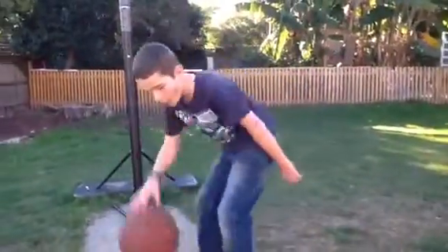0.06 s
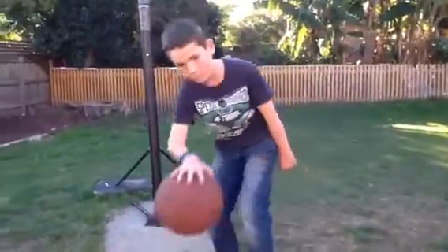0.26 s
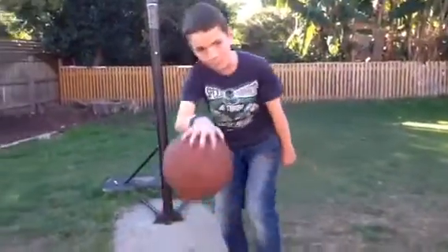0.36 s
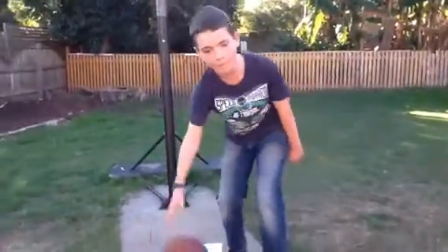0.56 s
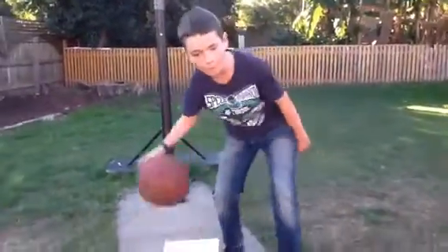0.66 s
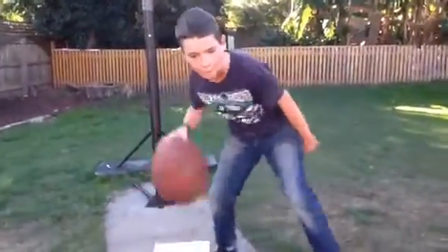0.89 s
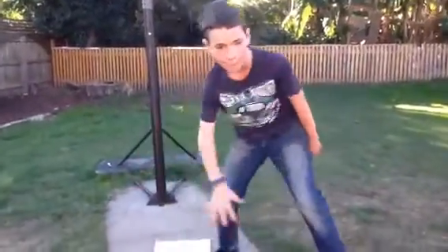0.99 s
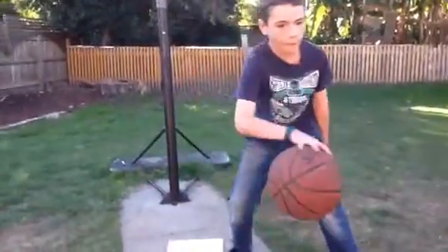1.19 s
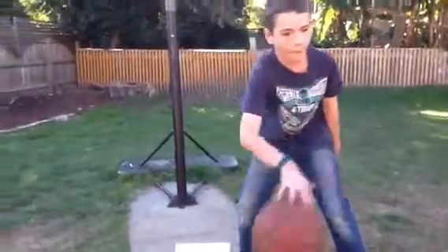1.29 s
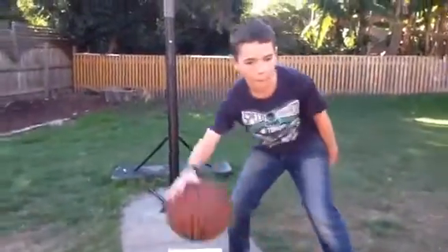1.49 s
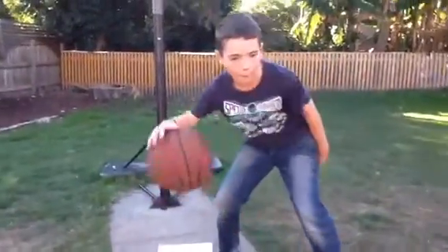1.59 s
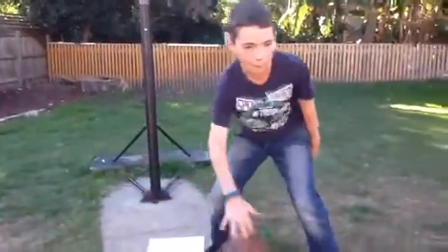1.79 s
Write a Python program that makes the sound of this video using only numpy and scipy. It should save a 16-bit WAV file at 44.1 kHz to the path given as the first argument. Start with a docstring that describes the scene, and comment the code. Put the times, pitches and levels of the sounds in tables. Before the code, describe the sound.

A basketball is dribbled on concrete close by, bouncing at about 0.2, 0.6, 1.1 and 1.5 seconds, the last a little softer. Each bounce is a sharp slap with a low thump, a short hollow ring and a light garden echo. A soft palm pat comes just before the first bounce; faint finger taps and brushes follow between and after the bounces, over a quiet outdoor hush.

```python
"""Basketball dribbled in a garden

A ball bounces four times on a concrete pad, close to a small microphone. Each bounce is a sharp slap,
a low thump of the flexing shell and a short ring of the shell and the air inside; fence and garden echo.
Between bounces the hand pats and brushes the ball, over a faint outdoor hush."""
import sys
import numpy as np
from scipy import signal
from scipy.fft import rfft, irfft, next_fast_len
from scipy.io import wavfile

SR = 44100
rng = np.random.default_rng(int(sys.argv[2]) if len(sys.argv) > 2 else 0)


def transcribe(signal):
    """Save signal, clipped to [-1, 1], as a 16-bit WAV file at the path in sys.argv[1]."""
    frames = np.atleast_2d(signal).T
    limited = np.clip(frames, -1, 1)
    pcm = np.round(limited * 32767).astype(np.int16)
    wavfile.write(sys.argv[1], SR, pcm)


N = 81585


def amp(db):
    """Decibels to gain."""
    return 10 ** (np.asarray(db) / 20)


def along(points, hz):
    """Interpolate (freq_hz, value) points on a log axis."""
    freqs, values = np.transpose(points)
    return np.interp(np.log(hz + 1), np.log(freqs + 1), values)


def since(start_s):
    """Seconds since start_s, zero before."""
    return np.maximum(np.arange(N) / SR - start_s, 0)


def fade(t, t60_s):
    """Sudden start, exponential decay."""
    return (t > 0) * np.exp(-np.log(1000) * t / t60_s)


def mode(t, hz, t60_s):
    """Decaying sine."""
    return fade(t, t60_s) * np.sin(2 * np.pi * hz * t)


def noise(spectrum):
    """Coloured noise, rms 1."""
    size = next_fast_len(N)
    gain = amp(along(spectrum, np.fft.rfftfreq(size, 1 / SR)))
    x = irfft(rfft(rng.standard_normal(size)) * gain, size)[:N]
    return x / np.sqrt(np.mean(x ** 2) + 1e-20)


def pulse(spectrum, size=2048):
    """Minimum-phase click, peak 1."""
    gain = amp(along(spectrum, np.fft.rfftfreq(size, 1 / SR)))
    cepstrum = irfft(np.log(gain))
    cepstrum[1:size // 2] *= 2
    cepstrum[size // 2 + 1:] = 0
    click = irfft(np.exp(rfft(cepstrum)))
    return np.pad(click / np.abs(click).max(), (0, N - size))


def delayed(x, delay_s):
    """Whole-sample delay."""
    return np.pad(x, (round(delay_s * SR), 0))[:N]


def butter(x, hz, kind, order):
    """Causal low-pass or high-pass."""
    return signal.sosfilt(signal.butter(order, hz, kind, fs=SR, output="sos"), x)


# freq_hz, density_db
HUSH_SPECTRUM = [(24, -57), (40, -35), (98, 2), (235, -2), (484, 0), (740, -6.5), (1080, -3.5), (1160, -7),
                 (1410, -7.5), (2330, -15), (2920, -14.5), (15500, -23)]


def outdoor_hush(level_db=-59.5):
    """Faint, steady background noise."""
    return amp(level_db) * noise(HUSH_SPECTRUM)


# freq_hz, density_db
GARDEN_SPECTRUM = [(70, -15), (150, 6), (280, 10), (400, -1.5), (520, 2.5), (750, -8.5), (1300, -13),
                   (2900, -22.5), (5000, -31), (14000, -51)]
# freq_hz, t60_s
GARDEN_DECAY = [(150, 0.64), (300, 0.34), (700, 0.25), (2000, 0.44), (8000, 0.39)]


def garden_reverb(start_s, rise_s=0.024):
    """Scatter from fence, trees and house; each frequency decays at its own rate."""
    hz, frame_s, bands = signal.stft(noise(GARDEN_SPECTRUM), SR, nperseg=512)
    t60_s = along(GARDEN_DECAY, hz)[:, None]
    decay = np.exp(-np.log(1000) * np.maximum(frame_s - start_s, 0) / t60_s)
    tail = signal.istft(bands * decay, SR, nperseg=512)[1][:N]
    return tail * (1 - np.exp(-since(start_s) / rise_s))


# delay_s, level_db, lowpass_hz
REFLECTIONS = [(.0088, -21, 1943), (0.0289, -20.5, 395), (0.0364, -17, 1000)]


def echoes(x):
    """Dull reflections off nearby surfaces and the fence."""
    return sum(amp(db) * delayed(butter(x, hz, "low", order=1), delay_s)
               for delay_s, db, hz in REFLECTIONS)


# start_s, level_db, noise_t60_s, body_db
PATS = [(.131, -40.5, 0.11, 9.5)]
# freq_hz, density_db
PAT_SPECTRUM = [(100, -9.5), (380, -9), (700, -17.5), (2000, -18.5), (6000, -20.5), (9000, -28.5),
                (15000, -51)]


def palm_pat():
    """The palm meets the ball: a noise burst and a short body tone."""
    out = np.zeros(N)
    for start_s, level_db, noise_t60_s, body_db in PATS:
        t = since(start_s)
        burst = noise(PAT_SPECTRUM) * fade(t, noise_t60_s)
        body = amp(body_db) * mode(t, hz=383, t60_s=0.033)
        out += amp(level_db) * (burst + body)
    return out


# start_s, level_db
TICKS = [(.8320, -45), (0.8513, -53), (1.5686, -43), (1.7160, -51.5)]
# freq_hz, density_db
TICK_SPECTRUM = [(300, -32), (2500, -7.5), (4500, 1), (8000, -9), (15000, -10)]


def finger_ticks():
    """Fingers tap the ball lightly."""
    envelope = sum(amp(db) * fade(since(start_s), t60_s=0.014) for start_s, db in TICKS)
    return noise(TICK_SPECTRUM) * envelope


# centre_s, half_width_s, level_db
BRUSHES = [(0.487, 0.15, -62.5), (0.708, 0.04, -56.5), (0.948, 0.058, -58), (1.562, 0.019, -56.5),
           (1.64, 0.062, -58)]
# freq_hz, density_db
BRUSH_SPECTRUM = [(500, 0.5), (2500, -2), (7000, -7.5), (15000, -11.5)]


def brushing():
    """Skin and cloth rub in soft swells."""
    envelope = sum(amp(db) * np.exp(-((since(0) - centre_s) / half_width_s) ** 2)
                   for centre_s, half_width_s, db in BRUSHES)
    return noise(BRUSH_SPECTRUM) * envelope


# Shell and enclosed air: pitch_hz, level_db, t60_s
RING_MODES = [(280.4, 2.5, 0.39), (479.4, 9.5, 0.14), (561, -2.5, 0.08), (639, 1, 0.076), (928, -7.5, 0.14),
              (993, -13.5, 0.31), (1160, -6, .15), (1500, -14, .18), (1520, -5.5, 0.061)]
# Thin, longer ping of the air: pitch_hz, level_db, t60_s
PING_MODES = [(2170, -2, .4), (2310, -1, .3), (2740, -1, .4), (3275, 2, .4), (3510, -3, .6), (3785, -2, .4),
              (4125, -4, .45)]


def ringing(t, ring_db, ping_db, sing_db, scatter_db=2.5):
    """Ball modes, varying in level per bounce; one high partial sings on into the next bounce."""
    out = amp(sing_db) * mode(t, hz=2830, t60_s=1.5)
    for modes, group_db in (RING_MODES, ring_db), (PING_MODES, ping_db):
        for hz, level_db, t60_s in modes:
            out += amp(group_db + level_db + scatter_db * rng.normal()) * mode(t, hz, t60_s)
    return out


def shell_flex(t, hz, rise_s):
    """Heavily damped swing of the shell; swells and dies in a few cycles."""
    age = t / rise_s
    return -age * np.exp(1 - age) * np.sin(2 * np.pi * hz * t)


def shell_smack(x, hz, boost_db):
    """Each landing stresses its own broad resonance of the shell."""
    b, a = signal.iirpeak(hz, Q=1.67, fs=SR)
    return x + (amp(boost_db) - 1) * signal.lfilter(b, a, x)


# freq_hz, density_db
SLAP_SPECTRUM = [(100, -20), (450, 8), (800, -9), (1200, 0), (2800, -12), (4200, -14.5), (7500, -19.5),
                 (15000, -42.5)]
# freq_hz, density_db
CRACK_SPECTRUM = [(150, -20), (520, 10), (800, -6.5), (1200, -0.5), (2800, -16.5), (4200, -23), (7500, -25),
                  (15000, -39.5)]


def ground_contact(start_s, slap_db, crack_db, treble_db, fold_lag_s, fold_db):
    """Slap, crack and a click as the ball folds flat; a softer, smeared crack echo about 8 ms later."""
    crack_echo_lag_s, crack_echo_db, treble_hz = 0.0082, -4.5, 4970
    click = pulse(SLAP_SPECTRUM)
    slap = amp(slap_db) * delayed(click, start_s)
    fold = amp(fold_db) * delayed(click, start_s + fold_lag_s)
    landing = fade(since(start_s), t60_s=0.031)
    crack_echo = amp(crack_echo_db) * fade(since(start_s + crack_echo_lag_s), t60_s=0.011)
    contact = slap + fold + amp(crack_db) * noise(CRACK_SPECTRUM) * (landing + crack_echo)
    return contact + (amp(treble_db) - 1) * butter(contact, treble_hz, "high", order=1)


# start_s, slap_db, crack_db, treble_db, smack_hz, smack_db, fold_lag_s, fold_db,
# thump_db, thump_hz, flex_lag_s, boom_db, ring_db, ping_db, sing_db, garden_trim_db
BOUNCES = [(0.2086, -1, -18.5, -14, 3070, 7.5, 0.002, -9, -3, 271, 0.00072, -10, -33, -56, -60.5, -1),
           (0.6366, -9, -19.5, -6, 2650, 9.5, 0.001661, -5.5, -4.5, 235, 0.00239, -18, -36, -55.5, -58.5, -0.5),
           (1.0946, -5, -17, 2, 1500, 6.5, .00214, -14, -1.5, 262, 0.00091, -11.5, -29.5, -59.5, -67, 0.5),
           (1.4622, -10.5, -21, -0.5, 1550, 10, .0019, -19.5, -18, 297, 0.0012, -11, -36, -60, -59.5, -1)]


def dribble(garden_db=-26.5):
    """The ball strikes concrete, flexes and rings; the surroundings answer."""
    ball, reverb = np.zeros(N), np.zeros(N)
    for (start_s, slap_db, crack_db, treble_db, smack_hz, smack_db, fold_lag_s, fold_db,
         thump_db, thump_hz, flex_lag_s, boom_db, ring_db, ping_db, sing_db, garden_trim_db) in BOUNCES:
        contact = ground_contact(start_s, slap_db, crack_db, treble_db, fold_lag_s, fold_db)
        ball += shell_smack(contact, smack_hz, smack_db)
        flex_t = since(start_s + flex_lag_s)
        ball += amp(thump_db) * shell_flex(flex_t, thump_hz, rise_s=0.002)
        ball += amp(boom_db) * shell_flex(flex_t, hz=173.9, rise_s=0.0039)
        ball += ringing(since(start_s), ring_db, ping_db, sing_db)
        tail = shell_smack(garden_reverb(start_s), smack_hz, smack_db / 2)
        reverb += amp(garden_db + garden_trim_db) * tail
    return ball + reverb + echoes(ball)


def scene():
    """Mono mix of ball, hand and hush."""
    return (dribble() + palm_pat() + finger_ticks() + brushing() + outdoor_hush())[None]


def record(dry):
    """Small microphone: bass cut, rounded peaks, band limit."""
    low_cut_hz, ceiling_db, top_hz = 164, -5, 15600
    x = butter(dry, low_cut_hz, "high", order=2)
    x = x / (1 + np.abs(x / amp(ceiling_db)) ** 4) ** (1 / 4)
    size = next_fast_len(N + SR // 2)
    passband = np.fft.rfftfreq(size, 1 / SR) < top_hz
    return irfft(rfft(x, size) * passband, size)[:, :N]


dry = scene()
out = record(dry)
transcribe(out)
```